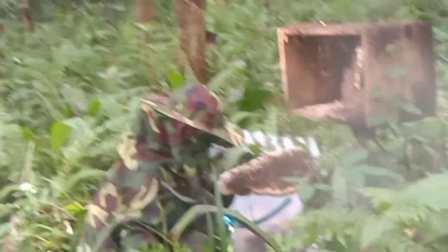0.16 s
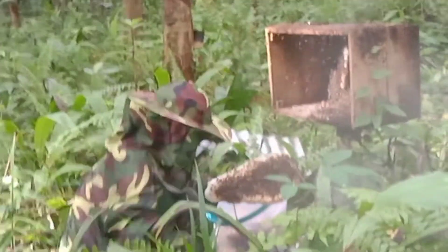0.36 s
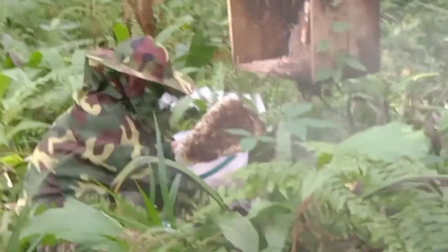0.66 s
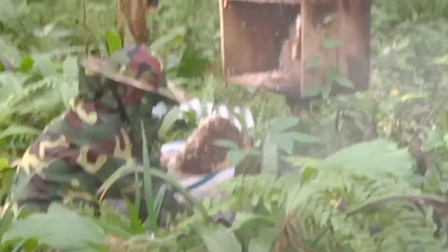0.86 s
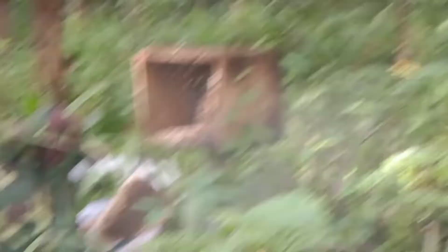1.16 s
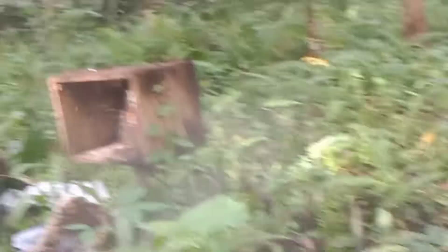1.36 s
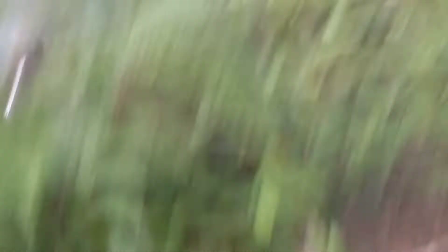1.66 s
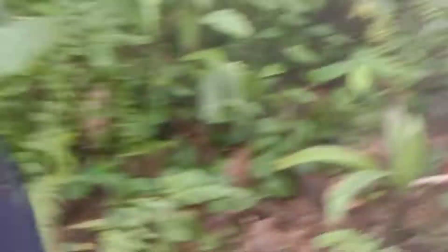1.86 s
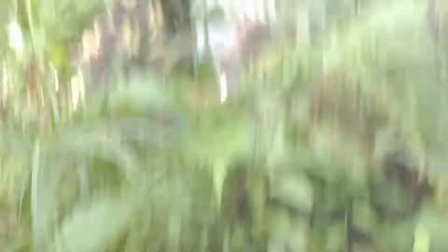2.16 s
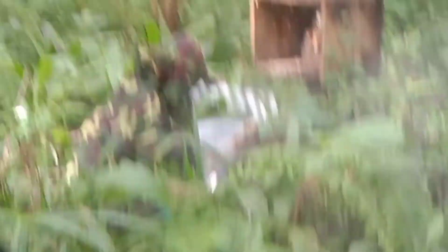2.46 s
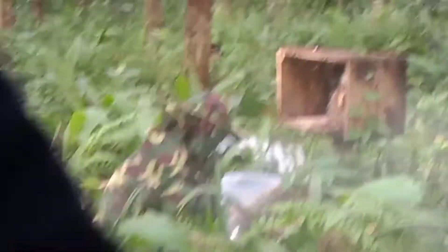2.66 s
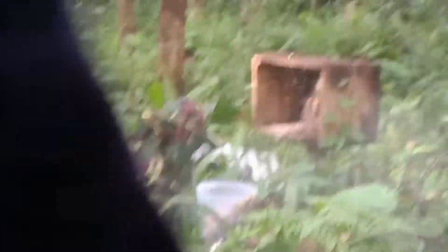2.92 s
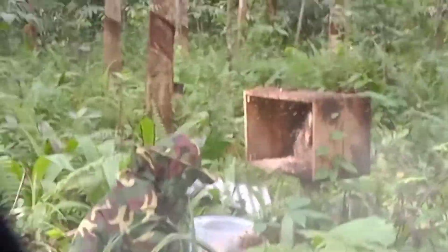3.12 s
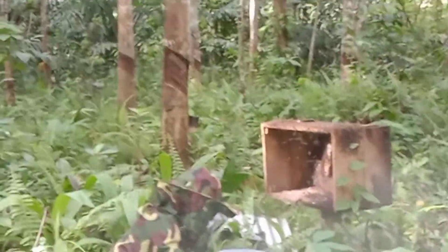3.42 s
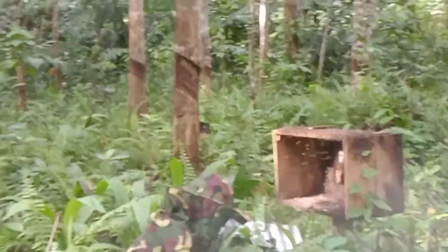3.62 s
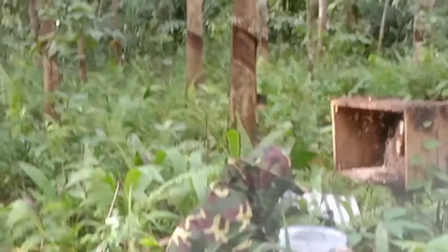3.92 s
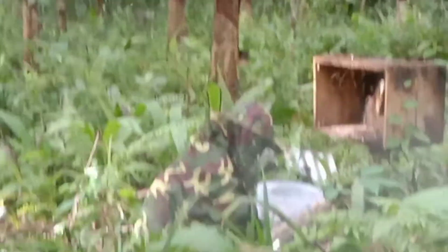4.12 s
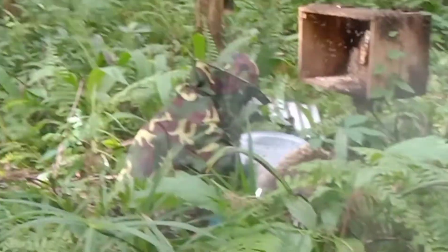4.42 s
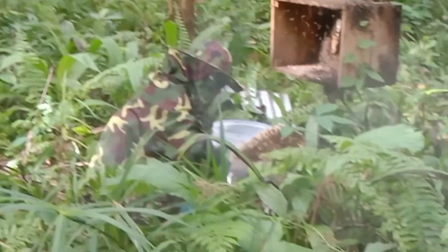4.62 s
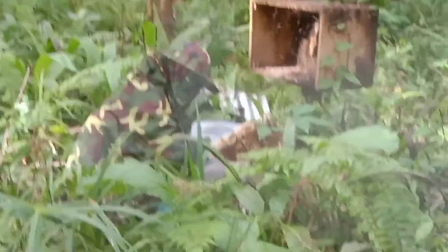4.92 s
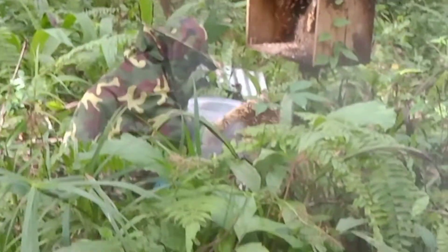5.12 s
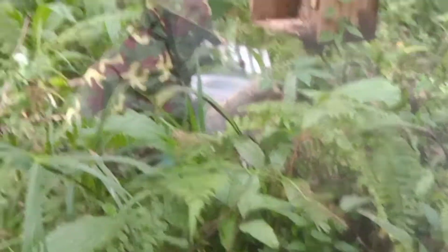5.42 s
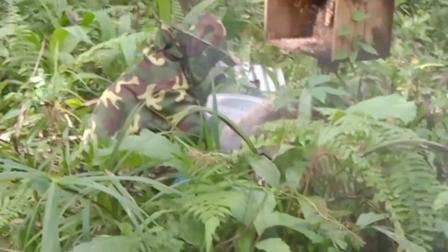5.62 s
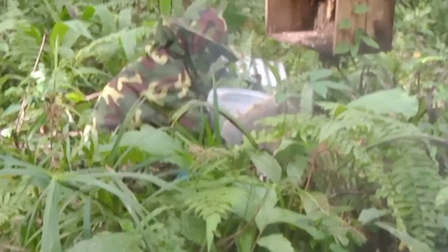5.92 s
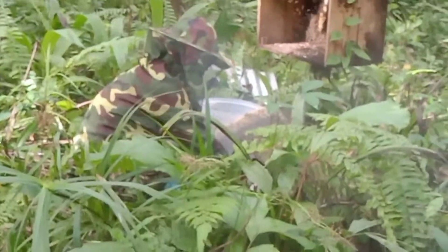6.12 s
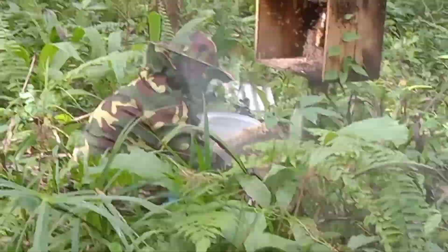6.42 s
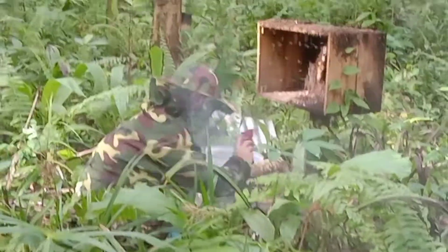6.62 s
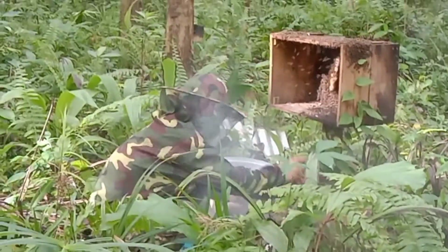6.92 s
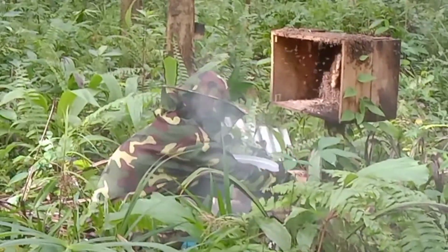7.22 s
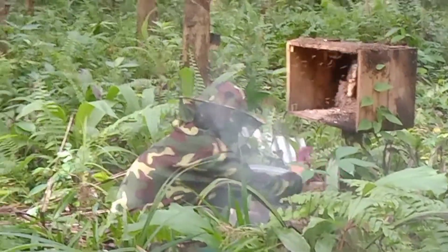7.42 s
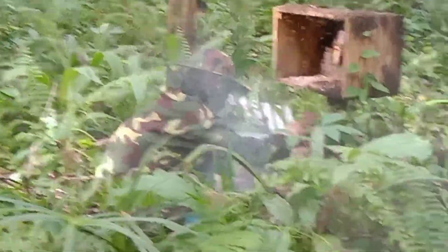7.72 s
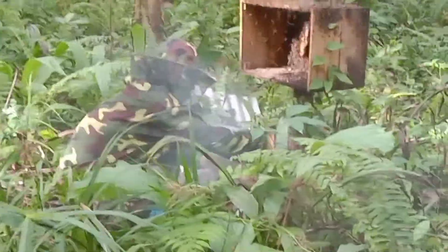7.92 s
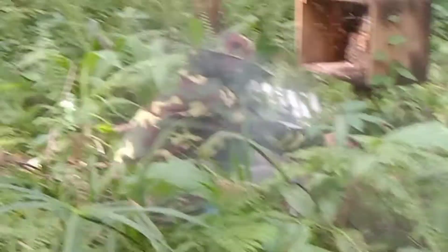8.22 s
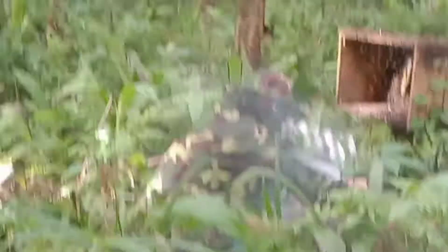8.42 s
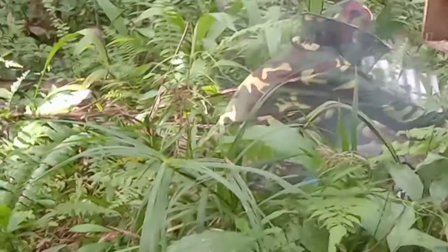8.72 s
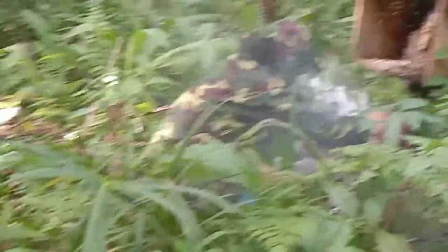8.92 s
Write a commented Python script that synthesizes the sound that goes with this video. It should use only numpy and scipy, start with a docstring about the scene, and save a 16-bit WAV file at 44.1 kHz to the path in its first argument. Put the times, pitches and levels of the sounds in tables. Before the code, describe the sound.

A close bee hums past repeatedly with leaf rustle and handling knocks, then a quieter swarm and steady insect whine, with scattered swishes.

```python
"""Bees at an opened hive in a forest

Honey bees swarm round the hive under the steady high whine of far cicadas; an insect whistles at times.
One bee swoops close by the microphone of a hand-held camera; short muffled low swells come and go.
Leaves and clothing rustle and swish nearby, one hard scrape crosses the port and bumps shake the body.
Wings are pulse trains, rubbing and low swells are shaped noise, whistles and bumps are sines; all mono."""
import sys
import numpy as np
from scipy import signal
from scipy.fft import rfft, irfft, next_fast_len
from scipy.io import wavfile
from scipy.ndimage import uniform_filter1d, minimum_filter1d, map_coordinates

SR = 44100
rng = np.random.default_rng(int(sys.argv[2]) if len(sys.argv) > 2 else 0)


def transcribe(u):
    """Save the signal u as a 16-bit wav file named by the first command-line argument.

    u: samples, shape (n,) or (channels, n), limited to [-1, 1]; the rate is SR.
    q: integer samples, one column per channel.
    """
    v = np.clip(np.atleast_2d(u).T, -1, 1)
    q = np.round(v * 32767).astype(np.int16)
    wavfile.write(sys.argv[1], SR, q)


N = 399987
TIME = np.arange(N) / SR  # s


def amp(db):
    """Decibels to gain."""
    return 10 ** (np.asarray(db) / 20)


def unit(x):
    """x at rms 1."""
    return x / np.sqrt(np.mean(x ** 2) + 1e-20)


def along(points, hz):
    """Gain of (frequency [Hz], gain [dB]) points on a log frequency axis."""
    f, db = np.transpose(points)
    return amp(np.interp(np.log(hz + 1), np.log(f + 1), db))


def curves(rows):
    """One value per sample for each column after the time."""
    s, *cols = np.transpose(rows)
    return [np.interp(TIME, s, c) for c in cols]


def wobble(rate):
    """A smooth random curve, rate knots a second."""
    coarse = TIME[::64]
    knots = rng.standard_normal(int(TIME[-1] * rate) + 4)
    return np.interp(TIME, coarse, map_coordinates(knots, [coarse * rate]))


def bell(s, half):
    """A Gaussian swell to 1 at s seconds."""
    return np.exp(-.5 * ((TIME - s) / half) ** 2)


def spell(start, length, attack, release):
    """An envelope that rises to 1 by its start, holds for its length and falls away (all in s)."""
    corners = [start - attack, start, start + length, start + length + release]
    return np.interp(TIME, corners, [0, 1, 1, 0])


def filtered(x, response):
    """x times a response of frequency."""
    m = next_fast_len(N + 8192)
    return irfft(rfft(x, m) * response(np.fft.rfftfreq(m, 1 / SR)), m)[:N]


def coloured(x, spectrum):
    """x shaped by the given spectrum, at rms 1."""
    return unit(filtered(x, lambda hz: along(spectrum, hz)))


def noise(spectrum, grain_db=0):
    """Noise of rms 1, its level varied in grains of about 2 ms by grain_db."""
    return coloured(rng.standard_normal(N) * amp(grain_db * wobble(500)), spectrum)


def patchy(x, depth_db, width_hz=180, life=.08):
    """Reflections from moving paths lift and cancel narrow bands for a moment; rms 1."""
    hz, t, z = signal.stft(x, SR, nperseg=1024)
    rows, cols = np.meshgrid(hz / width_hz, t / life, indexing="ij")
    knots = rng.standard_normal((512, 512))
    field = np.tanh(map_coordinates(knots, [rows, cols], order=1, mode="wrap"))
    uneven = z * amp(2 * depth_db * field)  # at most twice depth_db up or down
    return unit(signal.istft(uneven, SR, nperseg=1024)[1][:N])


def wingbeats(hz):
    """One sharp pressure pulse per wing stroke, placed between samples."""
    phase = rng.random() + np.cumsum(hz) / SR
    at = np.interp(np.arange(1, int(phase[-1])), phase, np.arange(N))
    whole, part = at.astype(int), at % 1
    early = np.bincount(whole, 1 - part, N + 1)
    late = np.bincount(whole + 1, part, N + 1)
    return (early + late)[:N]


# the air of the forest around the microphone: (frequency [Hz], relative level [dB per Hz])
FOREST_SPECTRUM = [(25, -18), (70, -4), (150, -3), (270, 5.5), (360, -3), (480, 6), (680, -3.5), (1450, 2),
                   (2000, -2.5), (4200, -4), (4900, -16.5), (5600, 0), (11400, -3.5), (15500, 1.5)]


def forest():
    """A faint, nearly even bed of noise."""
    return amp(-62.5 + 0.22 * wobble(2.9)) * noise(FOREST_SPECTRUM)


# the far cicada chorus: (time [s], level before gain_db [dB])
CICADA_LEVEL = [(2.8, -55.5), (4.51, -54), (6.62, -57), (7.53, -55.5), (9.07, -52.5)]
# its blurred band: (frequency [Hz], relative level [dB per Hz])
CICADA_SPECTRUM = [(5800, -48), (6500, -18.5), (7200, -9.5), (7700, -3), (8050, -4), (8250, -1),
                   (8550, -7.5), (8850, -25), (9300, -40), (11500, -33), (13500, -23.5), (14700, -19),
                   (16000, -14)]


def cicadas(gain_db=1.0, crest_hz=8245):
    """A far chorus blurs into one band, with a thin line at its crest."""
    chorus = noise(CICADA_SPECTRUM, grain_db=0.5) * amp(0.22 * wobble(15))
    crest_phase = 2 * np.pi * np.cumsum(crest_hz + 35 * wobble(150)) / SR
    crest = np.sin(crest_phase) * amp(2.7 * wobble(15) - 9.5)
    return amp(curves(CICADA_LEVEL)[0] + gain_db) * (chorus + crest)


# the swarm at the hive: (time [s], level before gain_db and surges [dB])
SWARM_LEVEL = [(2.8, -62), (3.69, -67), (4.61, -64), (4.75, -66), (5.23, -68), (5.66, -72), (6.38, -66),
               (6.91, -72), (7.15, -63.5), (7.25, -72)]
# its tone at the microphone: (frequency [Hz], gain [dB])
SWARM_GAIN = [(130, -42), (260, -8), (400, -23), (540, -15), (1050, -14), (1400, -2.5), (1900, -16),
              (2700, -5.5), (3400, 6.5), (3950, 1.5), (4300, -5.5), (4900, -17.5), (5600, 0), (7000, -31)]
# a few bees swing nearer and the swarm swells, or dips where negative:
# (time [s], rise [dB], half length [s])
SWARM_SURGES = [(4.28, -1, .12), (5.25, 3, .06), (6.053, 4.5, 0.032), (7.7, 5, 0.38), (8.547, 8, 0.25)]


def swarm(count=10, beat_hz=266, spread=.07, swerve=.03, swell_db=4.0, flutter_db=3.0, gain_db=4):
    """Each bee has its own wingbeat and swells and fades as it swerves about the hive."""
    bees = np.zeros(N)
    for own in np.linspace(-1, 1, count):
        hz = beat_hz * (1 + spread * own + swerve * wobble(6) + .006 * wobble(60))
        level_db = swell_db * np.tanh(wobble(5)) + flutter_db * wobble(40)
        bees += wingbeats(hz) * amp(level_db)
    strands = patchy(bees, depth_db=5.5, width_hz=130, life=.06)
    surge_db = sum(rise * bell(s, half) for s, rise, half in SWARM_SURGES)
    level = amp(curves(SWARM_LEVEL)[0] + surge_db + gain_db)
    return level * coloured(strands, SWARM_GAIN)


# leaves moving near the camera; brightness is taken off the soft rubs and added to the crisp grains:
# (start [s], length [s], level before trims [dB], brightness [dB])
RUSTLE_SPELLS = [(-.05, 0.41, -48, 0.5), (0.425, 0.95, -47.5, 1.5), (1.116, 0.292, -42, 4.5),
                 (1.452, 0.783, -48.5, 1), (2.337, .28, -45.5, -1), (7.598, 0.4016, -49.5, 3),
                 (8.256, 0.31, -55, 4.5), (8.87, .25, -48.5, 6.5)]
# soft rubs of leaves: (frequency [Hz], relative level [dB per Hz])
LEAF_SPECTRUM = [(100, -26), (700, -35.5), (1150, -45), (1400, -12), (1900, -30), (2450, -17), (3100, -2.5),
                 (3600, 2), (4200, -7.5), (4800, -18.5), (6000, -11), (7800, -8.5), (9500, -26),
                 (15000, -21)]
# brighter twigs: (frequency [Hz], relative level [dB per Hz])
TWIG_SPECTRUM = [(200, -22.5), (1000, -24), (1500, -11.5), (2000, -11), (2600, -1.5), (4200, 0),
                 (4900, -2.5), (6000, -0.5), (7800, -3.5), (9500, -27.5), (11500, -17.5), (13500, -7.5),
                 (15500, -4.5)]
RUSTLE_ATTACK_S, RUSTLE_RELEASE_S = 0.088, 0.14
RUSTLE_SETTLE_DB, RUSTLE_SETTLE_S = -11, .3  # the leaves sway on after each spell


def rustle(grain_db=4, twigs_db=-6, trim_db=-1):
    """Soft rubs of leaves, with brighter grains of twigs among them."""
    soft, crisp = np.zeros(N), np.zeros(N)
    for start, length, db, bright_db in RUSTLE_SPELLS:
        moving = spell(start, length, RUSTLE_ATTACK_S, RUSTLE_RELEASE_S)
        settling = amp(RUSTLE_SETTLE_DB) * spell(start, length, RUSTLE_ATTACK_S, RUSTLE_SETTLE_S)
        motion = np.maximum(moving, settling)
        soft = np.maximum(soft, amp(db - bright_db) * motion)
        crisp = np.maximum(crisp, amp(db + bright_db) * motion)
    rubs = noise(LEAF_SPECTRUM, grain_db=-1.5)
    leaves = soft * patchy(rubs, depth_db=3.0, width_hz=216.7, life=.05)
    twigs = crisp * amp(twigs_db) * noise(TWIG_SPECTRUM, grain_db)
    uneven = amp(1.6 * wobble(40) + 1.2 * wobble(9))
    return uneven * amp(trim_db) * (leaves + twigs)


# brushing strokes near the microphone:
# (time [s], level [dB], half length [s], low body relative to the rub [dB], pitch ratio)
SWISH_STROKES = [(.01, -43, 0.019, -39, 0.986), (.321, -46, 0.019, -16, 0.91),
                 (0.882, -42.5, 0.027, -23.5, 1.03), (1.187, -31, .01, -5.5, 1.14),
                 (1.367, -37, 0.011, -17, 0.96), (1.488, -42.5, 0.0101, -3.5, 1.04),
                 (1.554, -45, 0.0176, -12.5, 1.15), (1.795, -33, .01, -33.5, 1.087),
                 (2.463, -38.5, 0.024, -42.5, 1.11), (2.609, -46, 0.0404, -8.5, 0.953),
                 (2.719, -46, 0.017, -16, 0.713), (6.574, -52, 0.012, -22.5, 1.1),
                 (6.944, -44, 0.02, -26.5, 1.054), (6.985, -46, .005, -34, 1.195),
                 (7.3, -52, 0.06, -22, 1.05), (7.468, -53.5, 0.0148, -30, 1.1),
                 (7.62, -39, 0.014, -28.5, 0.98), (7.945, -39, 0.017, -27.5, 0.973),
                 (8.241, -37.5, 0.017, -25.5, 1.035), (8.418, -49, .015, -28.5, 1.25),
                 (8.52, -39, 0.015, -34.5, 0.965), (8.607, -45.5, 0.031, -35.5, 1.12),
                 (8.812, -36.5, 0.016, -31.5, 0.969), (9.04, -44.5, 0.023, -30, 1.077)]
# the rub of a stroke, before its pitch ratio: (frequency [Hz], relative level [dB per Hz])
SWISH_SPECTRUM = [(200, -43.5), (950, -44), (1400, -10), (1750, -12), (2400, -4), (3200, 4.5), (4000, 0.5),
                  (4900, -9), (6500, -10), (8000, -13), (9500, -29.5), (15000, -25.5)]
# the low body of a stroke: (frequency [Hz], relative level [dB per Hz])
BODY_SPECTRUM = [(100, -11), (350, -6.5), (550, -12.5), (850, 1.5), (1300, -4), (2000, -12.5),
                 (4000, -34.5)]


def swishes(tail_db=-15, tail_t60=0.53):
    """Each stroke swells to a sharp crest and trails off in its own colour; some have more low body."""
    out, t = np.zeros(N + SR), np.arange(-4096, 4096) / SR
    hz = np.fft.rfftfreq(len(t), 1 / SR)
    for s, db, half, body_db, ratio in SWISH_STROKES:
        grain_db = 2.5 * np.repeat(rng.standard_normal(len(t) // 64), 64)
        grains = rng.standard_normal(len(t)) * amp(grain_db)
        ripple_db = 2.5 * np.interp(hz, np.linspace(0, SR / 2, num=100), rng.standard_normal(100))
        z = rfft(grains) * amp(ripple_db)
        rub = unit(irfft(z * along(SWISH_SPECTRUM, hz / ratio)))
        body = amp(body_db) * unit(irfft(z * along(BODY_SPECTRUM, hz)))
        crest = np.exp(.5 - np.hypot(.5, 1.56 * t / half))  # about 10 dB down at the half length
        settling = amp(tail_db - 60 * np.abs(t) / tail_t60) * (t > 0)
        out[round(s * SR):][:len(t)] += amp(db) * np.maximum(crest, settling) * (rub + body)
    return out[len(t) // 2:][:N]


# the close bee's swoops past the microphone:
# (time when nearest [s], level [dB], half length [s], mean wingbeat [Hz])
BEE_PASSES = [(0.051, -54, .06, 272), (0.322, -52, .05, 290.6), (.62, -56, 0.04098, 280.2),
              (0.741, -55, .035, 288.2), (.9, -48.5, .045, 282.4), (1.034, -42.5, .035, 281.8),
              (1.105, -43, .05, 268.4), (1.338, -46, .07, 282.7), (1.465, -43, .055, 273),
              (1.625, -55.5, 0.03816, 285.3), (1.801, -57.5, .05, 272.8), (1.978, -59.5, 0.087, 283.8)]
DOPPLER = .022  # share by which the pitch is raised on approach and lowered on leaving
FALLOFF = 1.6  # power of distance by which a swoop fades


def flight():
    """Level [dB] and wingbeat [Hz]: each swoop swells as it nears and drops in pitch as it goes by."""
    power, pitch = np.zeros(N), np.zeros(N)
    for s, db, half, hz in BEE_PASSES:
        offset = (TIME - s) / half
        distance = np.sqrt(1 + offset * offset)  # relative to the nearest point
        heard = amp(db) ** 2 / distance ** (2 * FALLOFF)
        power += heard
        pitch += heard * hz * (1 - DOPPLER * offset / distance)
    return 10 * np.log10(power), pitch / power


# the close bee's tone: (frequency [Hz], gain [dB])
BEE_GAIN = [(100, -40), (200, -7), (275, 5.5), (555, 2), (830, -4.5), (1100, -17.5), (1400, -3.5),
            (1900, -8.5), (2500, -9.5), (3300, 3.5), (4200, -20), (5000, -18), (8000, -19), (12000, -43)]


def close_bee(waver=.014, swerve=.014, flutter_db=3.5, scatter=0.27, close_db=-45, thinning_db=7,
              smear_s=0.001206):
    """Wing pulses with an unsteady beat: full and clear when close, thin and scattered farther off."""
    db, hz = flight()
    far = np.clip((close_db - db) / 10, 0, 2)
    beat = hz * (1 + waver * wobble(70) + swerve * (.5 + 1.5 * far) * wobble(18))
    pulses = unit(wingbeats(beat) * amp(flutter_db * wobble(120)))
    # a stroke is a short sweep of air; smear_s is the phase delay at 1 kHz
    pulses = filtered(pulses, lambda hz: np.exp(-2j * np.pi * smear_s * np.sqrt(1000 * hz)))
    puffs = unit(uniform_filter1d(pulses, size=60) * rng.standard_normal(N))  # air stirred by each stroke
    buzz = coloured(pulses + scatter * (1 + far) * puffs, BEE_GAIN)
    low = filtered(buzz, lambda hz: 1 / (1 + (hz / 1000) ** 4))
    high = buzz - low
    hum = np.std(low) * patchy(low, depth_db=3.5, width_hz=250, life=0.0603)
    rasp = np.std(high) * patchy(high, depth_db=4, width_hz=248, life=.06)  # short waves bounce off leaves
    thinning = amp(far * (2.44 * wobble(22.046) - thinning_db))
    return amp(db) * (hum * thinning + rasp)


# an insect at the top of the treble: (frequency [Hz], relative level [dB per Hz])
HIGH_SPECTRUM = [(11000, -62), (13000, -8), (14800, -1.5), (16000, -4.5)]


def high_insect(pulse_at_s=2.83, period_s=.427, half_s=.07, level_db=-65):
    """Another insect pulses evenly throughout; pulse_at_s is the time of any one pulse."""
    offset = (TIME - pulse_at_s + period_s / 2) % period_s - period_s / 2
    return amp(level_db) * np.exp(-.5 * (offset / half_s) ** 2) * noise(HIGH_SPECTRUM)


# short muffled low swells of narrow noise: (time [s], level [dB], half length [s])
LOW_SWELLS = [(0.611, -55, 0.016), (.898, -56, 0.044), (1.268, -42, 0.015), (1.345, -46.5, 0.017),
              (1.617, -54, 0.077), (1.784, -53, 0.0307), (1.943, -45, .03), (2.267, -46.5, 0.032),
              (2.601, -47, 0.0442), (2.901, -47, 0.0348), (3.204, -52, 0.0437), (3.5, -49.5, 0.0386),
              (3.79, -52, 0.0377), (4.114, -53.5, 0.0458), (4.943, -48.5, 0.048), (5.35, -49, 0.032),
              (7.878, -73, 0.123), (8.59, -65, 0.0625)]
# their narrow low band: (frequency [Hz], relative level [dB per Hz])
LOW_SPECTRUM = [(40, -38), (90, -27.5), (140, -13), (195, -1), (245, 0), (300, -9.5), (380, -29.5),
                (600, -62.5)]


def low_swells(evenness=0.357):
    """Short muffled swells of narrow low noise, its own fluctuation partly evened out."""
    level = sum(amp(db) * bell(s, half) ** 1.73 for s, db, half in LOW_SWELLS)
    band = signal.hilbert(noise(LOW_SPECTRUM))
    return level * unit(band.real / (np.abs(band) + .5) ** evenness)


# bumps on the camera's body: (time [s], level [dB], frequency [Hz], half width of the push [cycles])
BODY_BUMPS = [(.63, -51.5, 140, 0.55), (0.75, -49, 129, 0.6), (1.249, -34, 168, 0.39),
              (1.65, -35, 127, 0.57), (1.751, -31, 129, 0.48), (1.808, -45, 130, 0.65),
              (1.908, -41.5, 126.4, 0.66), (2.109, -36.5, 141, 0.474), (2.365, -54, 150.6, 0.52),
              (5.547, -41.5, 282, 1.08), (5.556, -24, 294.3, 0.64), (5.569, -37, 199, 1.14)]


def bumps(ring_db=-15, ring_t60=0.1104):
    """A bump is a dull push of a cycle or two, then a short shudder."""
    out = np.zeros(N)
    for s, db, hz, cycles in BODY_BUMPS:
        t = TIME - s
        push = np.exp(-(t * hz / cycles) ** 2)
        shudder = amp(ring_db - 60 * np.abs(t) / ring_t60) * np.clip(t * hz, 0, 1)
        out += amp(db) * (push + shudder) * np.sin(2 * np.pi * hz * t)
    return out


# thin insect whistles: (start [s], length [s], level [dB])
INSECT_WHISTLES = [(.86, 0.293, -61.5), (2.7, 0.129, -61), (2.87, 0.093, -68), (3.753, .4, -69.5),
                   (8.567, 0.255, -70)]


def whistles(hz=4570):
    """An insect holds one thin, slightly trembling note."""
    level = sum(amp(db) * spell(s, length, 0.026, 0.041) for s, length, db in INSECT_WHISTLES)
    note = np.sin(2 * np.pi * np.cumsum(hz + 35 * wobble(150)) / SR)
    return level * amp(4.0 * wobble(35)) * note


# the grip shifts once on the camera: (start [s], length [s], level [dB])
GRIP_SHIFT = (1.19, 0.19, -49.5)
# the rubbed case: (frequency [Hz], relative level [dB per Hz])
CASE_SPECTRUM = [(25, -30), (60, -0.5), (110, 3.5), (350, -2.5), (600, -7), (1200, -6), (2000, -21),
                 (4000, -52.5)]
GRIP_ATTACK_S, GRIP_RELEASE_S = 0.0161, 0.046
GRIP_SETTLE_DB, GRIP_SETTLE_S = -11.5, 0.34  # the hand settles with a faint creak


def grip():
    """The hand rubs the case: grainy, mostly low noise."""
    start, length, db = GRIP_SHIFT
    shift = spell(start, length, GRIP_ATTACK_S, GRIP_RELEASE_S)
    settle = amp(GRIP_SETTLE_DB) * spell(start, length, GRIP_ATTACK_S, GRIP_SETTLE_S)
    return amp(db + 2.0 * wobble(34.3)) * np.maximum(shift, settle) * noise(CASE_SPECTRUM, grain_db=4.0)


# the catches of one hard scrape across the microphone port: (time [s], level [dB])
SCRAPE_CATCHES = [(1.3965, -13), (1.400, -7.5), (1.403, -6), (1.406, -6), (1.4115, -5)]
# the scraped port: (frequency [Hz], relative level [dB per Hz])
PORT_SPECTRUM = [(100, -43), (400, -38.5), (850, -18), (1300, -7), (1800, -33), (2300, -32.5), (2900, -7),
                 (3500, 8), (4200, -5.5), (5100, -3.5), (7300, -13.5), (10000, -57.5), (13000, -20.5),
                 (16000, -29)]
SCRAPE_T60 = .023  # s, each catch dies away alike


def scrape():
    """Something catches on the port several times in quick succession; their powers add."""
    power = np.zeros(N)
    for s, db in SCRAPE_CATCHES:
        power += amp(db - 60 * np.abs(TIME - s) / SCRAPE_T60) ** 2 * (TIME >= s)
    return np.sqrt(power) * noise(PORT_SPECTRUM)


# a sleeve slides close by the microphone: (start [s], length [s], level [dB])
SLEEVE_SLIDE = (2.44, .195, -44)
# its cloth: (frequency [Hz], relative level [dB per Hz])
CLOTH_SPECTRUM = [(200, -31), (700, -20), (1500, -3.5), (2200, -2.5), (3400, -2.5), (5000, 5), (7500, 5.5),
                  (9500, -5), (11500, -5), (14500, 0)]
SLEEVE_ATTACK_S, SLEEVE_RELEASE_S = 0.121, 0.039


def sleeve():
    """Cloth slides past once: grainy, patchy noise that swells and stops."""
    start, length, db = SLEEVE_SLIDE
    level = amp(db + 0.84 * wobble(30.24)) * spell(start, length, SLEEVE_ATTACK_S, SLEEVE_RELEASE_S)
    return level * patchy(noise(CLOTH_SPECTRUM, grain_db=4), depth_db=4, width_hz=180, life=0.054)


def scene():
    """All sources at one microphone, the same in both channels."""
    insects = cicadas() + swarm() + close_bee() + high_insect() + whistles()
    rubbing = rustle() + swishes() + scrape() + sleeve()
    handling = bumps() + grip()
    mono = forest() + insects + low_swells() + rubbing + handling
    return np.array([mono, mono])


def limited(x, ceiling_db=-6.0):
    """A limiter looks ahead, ducks everything round a loud peak and recovers slowly."""
    need = np.minimum(1, amp(ceiling_db) / (np.abs(x) + 1e-9))
    ahead, attack, release = int(.036 * SR), int(.003 * SR), .05 * SR  # samples
    cut = uniform_filter1d(1 - minimum_filter1d(need, ahead), attack)
    lingering = signal.lfilter([1 / release], [1, 1 / release - 1], cut)
    return x * (1 - np.maximum(cut, lingering))


def record(dry, low_hz=60, top_hz=15750):
    """The camera limits peaks, thins the deep bass and keeps nothing above its band limit."""
    def band(hz):
        return (hz < top_hz) * hz ** 2 / np.hypot(hz ** 2, low_hz ** 2)
    return np.array([filtered(limited(x), band) for x in dry])


dry = scene()
out = record(dry)
transcribe(out)
```